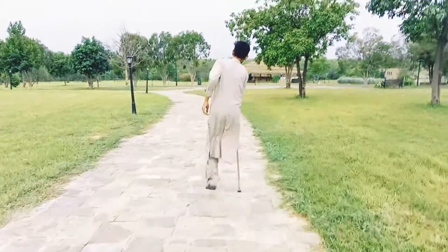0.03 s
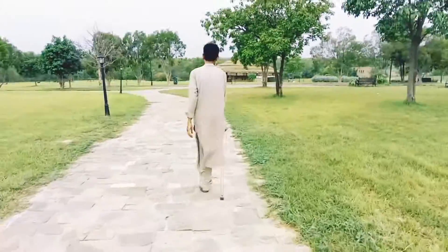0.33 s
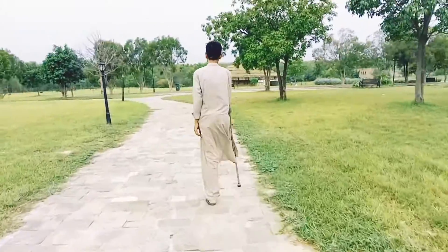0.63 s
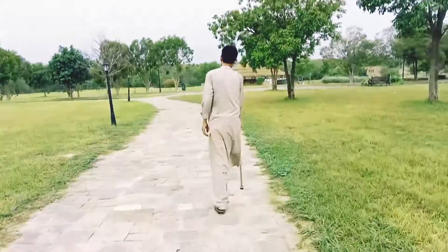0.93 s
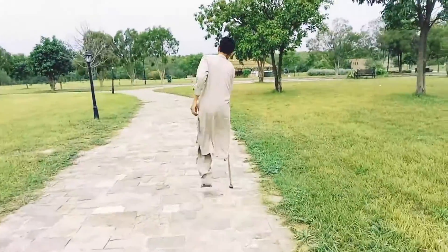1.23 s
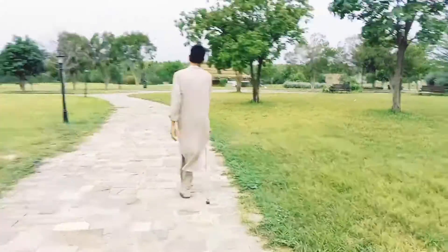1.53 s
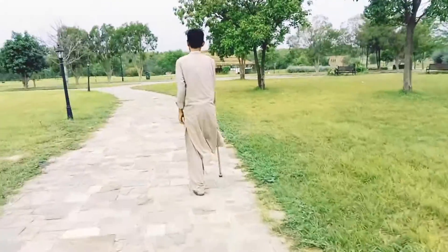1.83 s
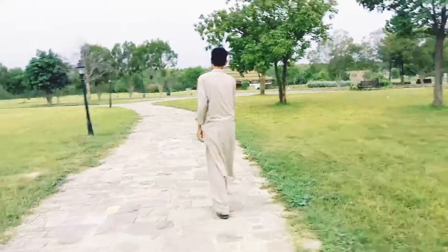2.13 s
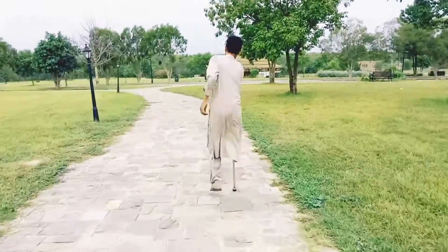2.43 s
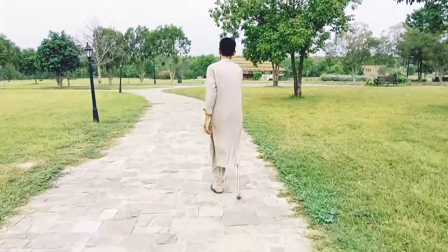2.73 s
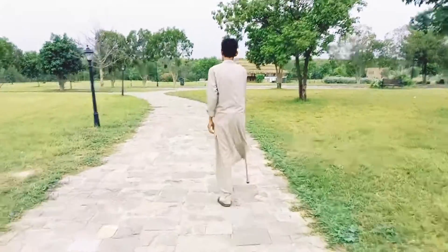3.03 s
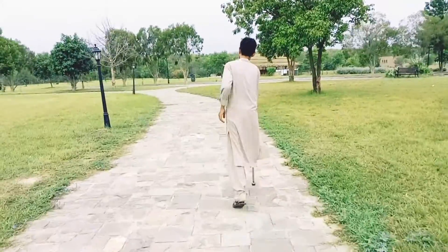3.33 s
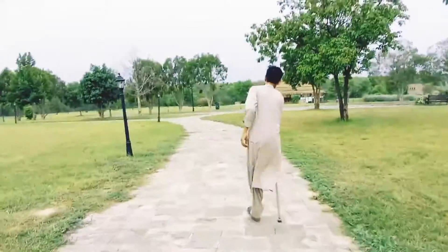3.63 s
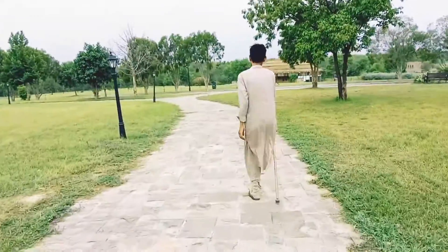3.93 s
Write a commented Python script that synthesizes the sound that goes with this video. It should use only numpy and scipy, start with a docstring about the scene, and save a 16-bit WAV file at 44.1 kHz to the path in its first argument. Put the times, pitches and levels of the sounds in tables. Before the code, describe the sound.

Birds twitter and trill in an open park, then one stands out with six quick, rising whistles. Underneath are faint crutch taps and shoe scuffs on paving a few steps from the microphone, and a soft leaf rustle.

```python
"""A bird whistles six arched calls, each higher than the last, over a park where others trill and chip.
Each bird note is a frequency-modulated tone, scattered by trunks and leaves; a chorus of tiny falling
chirps adds an insect-like shimmer. A crutch strikes the paving and its shaft rings in damped modes,
a shoe scuffs by friction on sand, and beneath it all far foliage rustles and light air rumbles."""
import sys
import numpy as np
from scipy import signal
from scipy.fft import rfft, irfft
from scipy.io import wavfile
from scipy.ndimage import uniform_filter1d

SR = 44100
rng = np.random.default_rng(int(sys.argv[2]) if len(sys.argv) > 2 else 0)


def master(y):
    """Save y as 16-bit WAV."""
    cut = np.clip(np.atleast_2d(y).T, -1, 1)
    pcm = np.round(cut * 32767)  # scale
    wavfile.write(sys.argv[1], SR, pcm.astype(np.int16))


N = 176400

# whistled calls: crest_s, crest_hz, dip_hz, end_hz, crest_db, lead_db, lead_s, fall_s
CALLS = [(2.137, 1296, 1036, 941, -48.5, -64.5, 0.045, 0.045),
         (2.393, 1362, 1070, 972, -45, -56, 0.101, 0.08),
         (2.693, 1506, 1224, 1016, -40.5, -50, 0.12, 0.074),
         (2.978, 1577, 1367, 1036, -40, -48.5, 0.13, 0.078),
         (3.258, 1654, 1451, 1104, -38.5, -39.5, 0.1167, .083),
         (3.542, 1706, 1528, 1141, -38.5, -44.5, 0.13, 0.074)]
# their reflections from near trunks: delay_s, gain_db
TRUNK_ECHOES = [(.011, -15), (.019, -14), (.033, -13), (.058, -18)]
# songbird notes: start_s, length_s, start_hz, middle_hz, end_hz, level_db, trill_depth_hz
SONG_NOTES = [(0, 0.051, 3088, 3152, 3230, -60.5, 0), (0.555, 0.051, 2450, 2400, 2480, -75.5, 0),
              (0.661, 0.034, 2610, 2640, 2660, -69.5, 24), (.312, 0.077, 5430, 5560, 5540, -62.5, 57),
              (0.466, 0.064, 1207, 1260, 1255, -68, -21), (0.955, 0.179, 1664, 1773, 1740, -62.5, 133),
              (1.24, 0.029, 2900, 2165, 2090, -56.5, 16), (1.31, 0.056, 1960, 1695, 1744, -66.5, 10),
              (1.624, 0.18, 1843, 1906, 1612, -61.5, 110.5), (1.638, 0.093, 2650, 2260, 2005, -65, 46),
              (1.326, 0.03, 3780, 3860, 3620, -71, 212), (1.735, 0.13, 4140, 4470, 4460, -78, 77),
              (1.912, 0.039, 4210, 3330, 2850, -74, 23), (1.821, 0.11, 1235, 1379, 1445, -66.5, 42),
              (2.037, 0.052, 3315, 2750, 2040, -63.5, 12), (2.451, 0.1, 1510, 1520, 1590, -52.5, 101),
              (2.462, 0.04, 3190, 2902, 3110, -57.5, 4), (2.629, 0.06, 2350, 2694, 2860, -59.5, 73),
              (2.691, 0.065, 2474, 2543, 2430, -63, 54), (2.89, 0.071, 2460, 2786, 2750, -65.5, 7),
              (2.954, 0.081, 2320, 2335, 2690, -62.5, 148), (2.993, 0.16, 2100, 1988, 1922, -53.5, 131.5),
              (3.084, 0.1, 2450, 2355, 2264, -61, 155), (3.148, 0.063, 2905, 2910, 2910, -63, 125.5),
              (3.648, 0.25, 1559, 1634, 1726, -55, 150), (3.733, 0.068, 2580, 2555, 2550, -63.5, -4),
              (3.734, 0.101, 5175, 5120, 5140, -64.5, 2)]
# loudness of the repeated chip: time_s, level_db
CHIP_LEVELS = [(1.37, -62), (1.53, -63), (1.7, -58.5), (2.35, -54.5), (3, -52), (3.3, -51.5), (4, -60)]
# bursts of twitter: start_s, level_db
TWITTER_BURSTS = [(-.025, -60), (.057, -59.5), (0.14, -55.5), (.223, -59.5), (0.623, -59.5), (0.7, -57),
                  (0.784, -56.5), (.866, -59), (0.949, -60.5), (1.034, -60.5), (1.127, -62), (1.557, -66),
                  (1.637, -64), (1.72, -63), (1.812, -64.5)]
# loudness of the chorus: time_s, level_db
CHORUS_LEVELS = [(0, -65), (.7, -67.5), (1.27, -64), (1.48, -73), (2.05, -69), (2.5, -64), (2.95, -62.5),
                 (3.45, -60), (4, -61.5)]
# spectrum of the chorus: frequency_hz, gain_db
CHORUS_SPECTRUM = [(5600, -45), (6200, 6), (6550, 6.5), (6850, 7), (7350, -5.5), (7900, 0), (8350, -2.5),
                   (8900, -37.5)]
# impacts of the crutch: start_s, click_db, knock_db, snap_db
CRUTCH_TAPS = [(0.2453, -77, -59.5, -56), (.288, -59.5, -77, -88), (0.372, -64, -91, -63),
               (0.859, -49, -78, -65), (.992, -59.5, -90, -82), (1.031, -51.5, -96, -62),
               (1.182, -59, -88, -82), (1.698, -69, -89, -68), (2.251, -57, -73, -63),
               (2.777, -44.5, -65.5, -63.5), (3.089, -40.5, -75, -73), (3.617, -58, -68.5, -72),
               (3.787, -48.5, -75, -55.5)]
# modes of its shaft: pitch_hz, level_db, t60_s
SHAFT_MODES = [(3534, -13.5, .08), (3770, -4.5, 0.016), (5300, 4, .016)]
# slides of the sole: start_s, length_s, grit_db, rasp_db, rub_db
SHOE_SCUFFS = [(0.223, 0.015, -88, -80, -87), (0.293, 0.073, -71.5, -77, -66.5),
               (0.787, 0.125, -89, -74, -79), (1.513, 0.045, -75, -70, -70.5),
               (1.627, 0.032, -83, -83, -72.5), (1.692, 0.072, -88, -73, -77),
               (2.148, 0.075, -84.5, -69.5, -80), (1.167, 0.092, -96, -68, -93),
               (2.36, 0.089, -99, -62, -68), (2.818, 0.1, -83.5, -63.5, -96.5),
               (3.412, 0.032, -80, -72, -81), (3.79, 0.13, -82, -83, -91)]
# spectra of the tip's crack, the sand, the sole's rasp and its dull rub: frequency_hz, gain_db
CRACK_SPECTRUM = [(2200, -19), (3200, -9), (5800, -2.5), (6800, 5), (8500, -37)]
GRIT_SPECTRUM = [(3000, -25), (6000, -6), (10000, 12), (13000, 14), (15500, 0)]
RASP_SPECTRUM = [(2500, -16), (3400, -2.5), (4200, -16.5), (5300, 5), (6200, -0.5), (9000, -58.5)]
RUB_SPECTRUM = [(300, -12), (850, 9), (1500, 4.5), (4000, -32)]
# distant flocks: centre_hz, spread_hz, level_db
FLOCKS = [(2700, 480, -76.5), (5296, 650, -81)]
# spectra of far foliage and moving air: frequency_hz, gain_db
FOLIAGE_SPECTRUM = [(35, -4.5), (150, 6), (370, -6), (480, -14), (800, -11.5), (1250, -2.5), (1800, -7.5),
                    (2500, -20), (3050, -6), (3600, -23.5), (4300, -27.5), (5200, -19.5), (8400, -8.5),
                    (9200, -38), (15000, -33)]
AIR_SPECTRUM = [(20, -31.5), (40, -25.5), (70, 3), (105, -6), (150, -7.5), (220, -18.5), (400, -50.5),
                (900, -65.5)]
# their loudness: time_s, level_db
FOLIAGE_LEVELS = [(0, -69), (1.25, -70.5), (1.48, -72.5), (2.1, -68.5), (3, -65), (4, -66.5)]
AIR_LEVELS = [(0, -69.5), (.75, -65.5), (.9, -81), (1.27, -66), (1.48, -89), (1.9, -74.5), (2.08, -71.5),
              (2.4, -72), (2.88, -75), (2.98, -54), (3.15, -65), (3.7, -67), (4, -69)]


def whistler(lift_hz=77.4, falter_db=-9, fall_db=-6.5):
    """Interference: a pure tone dips, arches, falters and slides down, beating against its echoes."""
    out, t = np.zeros(N), np.arange(N) / SR
    waver = 1 + 0.0109 * walk(81)
    pitch_stages = [-1, -.8, -.55, -.35, -.06, .1, .45, 1]
    gain_stages = [-1.03, -.85, -.42, -.15, .1, .27, .45, .75, 1.15]
    for crest_s, crest_hz, dip_hz, end_hz, crest_db, lead_db, lead_s, fall_s in CALLS:
        stage = (t - crest_s) / np.where(t < crest_s, lead_s, fall_s)  # -1 onset, 0 crest, 1 end
        lead_pitches = [dip_hz + lift_hz / 2, dip_hz + lift_hz, dip_hz, dip_hz + 35]
        arch_pitches = [crest_hz, crest_hz, (crest_hz + end_hz) / 2 + 20, end_hz]
        pitch = np.interp(stage, pitch_stages, lead_pitches + arch_pitches)
        pitch = uniform_filter1d(pitch, size=600) * waver
        lead_gains = undb([lead_db, lead_db + falter_db / 10])
        arch_gains = undb(crest_db) * undb([0, 0, falter_db, fall_db / 2, fall_db])
        envelope = np.interp(stage, gain_stages, [0, *lead_gains, *arch_gains, 0])
        out += np.sqrt(2) * envelope * np.sin(phase_of(pitch))
    out *= undb(1.7 * walk(85))  # the level flutters
    echoes = sum(undb(db) * np.interp(t - delay, t, out) for delay, db in TRUNK_ECHOES)
    return trees(out, wet_db=-9.5) + echoes


def songbirds():
    """Frequency modulation: slow sweeps are heard as slurs, fast ones as buzzy trills."""
    out = np.zeros(N)
    for start, length, *pitches, db, depth_hz in SONG_NOTES:
        add(out, start, undb(db) * note(length, pitches, depth_hz))
    return trees(out, wet_db=-4)


def chipping_bird(first_s=1.365, gap_s=.1605):
    """A pulse train: one high falling chip repeats among the leaves, slowing a little."""
    out = np.zeros(N)
    for k in range(17):
        start = first_s + gap_s * k + .00013 * k ** 2
        db = np.interp(start, *np.array(CHIP_LEVELS).T)
        top_hz = 7100 + 70 * rng.standard_normal()
        add(out, start, undb(db) * chirp(.02, top_hz, end_hz=6157))
    return trees(out * undb(3 * walk(200)), wet_db=-6)


def twittering_bird(gap_s=.011):
    """Direct sound outweighs reverberation as a nearer bird twitters in bursts of four chirps."""
    out = np.zeros(N)
    for start, db in TWITTER_BURSTS:
        for k, chance in enumerate(rng.standard_normal(4)):
            pulse = chirp(.0086, 8296 + 60 * chance, end_hz=7520)
            add(out, start + k * gap_s, undb(db + chance) * pulse)
    return trees(out, wet_db=-16)


def chorus(runs=100, gap_s=.011):
    """Superposition: runs of tiny falling chirps merge with faint noise into a grainy shimmer."""
    out = np.zeros(N)
    for i, (when, pitch, pace) in enumerate(rng.uniform(-0.83, 1, (runs, 3))):
        run_start = (i + when / 2 - 1) * N / SR / (runs - 1)
        for k, (detune, strength) in enumerate(rng.uniform(-1.003, 1, (4, 2))):
            top_hz = 8150 + 200 * pitch + 380 * detune
            start = run_start + k * gap_s * (1 + .15 * pace)
            add(out, start, undb(4 * strength) * chirp(.014, top_hz, top_hz - 1700))
    shimmer = unit(trees(out, wet_db=-6)) + rng.standard_normal(N) / 4
    return colour(shimmer, CHORUS_SPECTRUM) * curve(CHORUS_LEVELS)


def crutch(contact_s=.0006, crack_s=.0011, crunch_rise_s=.005, crunch_decay_s=.02, knock_hz=700):
    """Impact: the tip crunches sand, cracks and knocks on stone, and excites the shaft's damped modes."""
    out, t = np.zeros(N), np.arange(-SR // 20, SR // 10) / SR
    after = np.maximum(t, 0)  # the tip meets stone at t = 0
    contact = np.sin(np.pi / 2 * np.minimum(after / contact_s, 1)) ** 2
    blow = contact * np.exp(-after / crack_s)
    crunch = undb(-16) * np.exp(np.minimum(t / crunch_rise_s, -t / crunch_decay_s))
    knock = 2 * np.sin(2 * np.pi * knock_hz * after) * np.exp(-after / 0.0029)
    for start, click_db, knock_db, snap_db in CRUTCH_TAPS:
        ring = np.zeros(len(t))
        for hz, db, t60 in SHAFT_MODES:
            mode_hz = hz * (1 + 0.051 * rng.standard_normal())  # each tap rings differently
            ring += undb(db - 60 * after / t60) * np.sin(2 * np.pi * (mode_hz * t + rng.random()))
        crack, snap = (blow * colour(rng.standard_normal(len(t)), spectrum)
                       + crunch * colour(grit(len(t)), spectrum)
                       for spectrum in (CRACK_SPECTRUM, GRIT_SPECTRUM))
        click = contact * ring + crack
        add(out, start + t[0], undb(click_db) * click + undb(snap_db) * snap + undb(knock_db) * knock)
    return trees(out, wet_db=-23.5)


def shoe():
    """Sliding friction: the sole drags sand, rasps and rubs over the paving in uneven catches."""
    out, t = np.zeros(N), np.arange(N) / SR
    catches = undb(5.5 * np.tanh(walk(220)))
    layers = [colour(grit(N) * catches, spectrum)
              for spectrum in (GRIT_SPECTRUM, RASP_SPECTRUM, RUB_SPECTRUM)]
    for start, length, *levels_db in SHOE_SCUFFS:
        envelope = np.sin(np.pi * np.clip((t - start) / length, 0, 1))
        out += envelope * sum(undb(db) * layer for db, layer in zip(levels_db, layers))
    return trees(out, wet_db=-16)


def far_flocks(notes=60):
    """Reverberation blurs the short notes of two distant flocks into chatter."""
    out = np.zeros(N)
    for centre_hz, spread_hz, db in FLOCKS:
        flock = np.zeros(N)
        for i, (when, span, depth, *contour) in enumerate(rng.random((notes, 6))):
            base_hz = centre_hz + spread_hz * (2 * contour[0] - 1)
            pitches = base_hz + spread_hz / 2 * (np.array(contour) - .5)
            add(flock, (i - when) * N / SR / notes, note(.02 + .04 * span, pitches, 100 * depth))
        out += undb(db) * unit(trees(flock, wet_db=-4))
    return out


def foliage():
    """Broadband noise: countless far leaves sum to an even rustle."""
    rustle = colour(rng.standard_normal(N), FOLIAGE_SPECTRUM)
    return rustle * curve(FOLIAGE_LEVELS) * undb(0.092 * walk(30))


def air(gust_db=4):
    """Pressure fluctuations: uneven air at the microphone makes a low rumble."""
    gusts = rng.standard_normal(N) * undb(gust_db * walk(5.8))
    return colour(gusts, AIR_SPECTRUM) * curve(AIR_LEVELS)


def trees(x, wet_db, t60_s=.35):
    """Scattering: trunks and leaves add an exponentially decaying tail to the direct sound."""
    t = np.arange(SR) / SR
    tail = rng.standard_normal(SR) * undb(-60 * t / t60_s) * (1 - np.exp(-t / 0.0018))
    return x + undb(wet_db) * signal.fftconvolve(x, tail / np.linalg.norm(tail))[:N]


def note(length_s, pitches, depth_hz, trill_hz=69.77, rasp_db=3.2):
    """Modulation: a slur through three pitches trills in frequency and rasps in amplitude."""
    t = np.arange(int(length_s * SR)) / SR
    waver, rasp = (np.interp(t * 300, np.arange(100), row) for row in rng.standard_normal((2, 100)))
    trill = np.sin(phase_of(trill_hz * (1 + rasp / 5)))
    slur = np.polyval(np.polyfit([0, .5, 1], pitches, 2), t / length_s)
    pitch = (slur + depth_hz * trill) * (1 + .011 * waver)
    envelope = np.sin(np.pi * t / length_s) ** .5 * undb(rasp_db * rasp)
    return np.sqrt(2) * envelope * np.sin(phase_of(pitch))


def chirp(length_s, top_hz, end_hz):
    """A frequency sweep: a short whistle falls under a half-sine envelope."""
    progress = np.linspace(0, 1, int(length_s * SR))
    pitch = top_hz + (end_hz - top_hz) * progress ** 1.31
    return np.sqrt(2) * np.sin(np.pi * progress) * np.sin(phase_of(pitch))


def grit(size, spread_db=8):
    """Impulsive noise: dense sand grains crack, each with its own strength."""
    return rng.standard_normal(size) * undb(spread_db * rng.standard_normal(size))


def undb(db):
    """Decibels to amplitude ratio."""
    return 10 ** (np.asarray(db) / 20)


def unit(x):
    """Normalisation to rms 1."""
    return x / np.sqrt(np.mean(x ** 2) + 1e-20)


def curve(rows):
    """An amplitude envelope through (time_s, level_db) points."""
    return undb(np.interp(np.arange(N) / SR, *np.array(rows).T))


def colour(x, spectrum):
    """Spectral shaping by (frequency_hz, gain_db) points, at rms 1."""
    hz, db = np.array(spectrum).T
    f = np.maximum(np.fft.rfftfreq(len(x), 1 / SR), 1)
    gain = undb(np.interp(np.log(f), np.log(hz), db))
    return unit(irfft(rfft(x) * gain, len(x)))


def walk(rate_hz):
    """Low-passed noise: a smooth random fluctuation of rms 1."""
    f = np.fft.rfftfreq(N, 1 / SR)
    return unit(irfft(rfft(rng.standard_normal(N)) * np.exp(-(f / rate_hz) ** 2), N))


def add(out, start_s, x):
    """Superposition of x on out from start_s."""
    i = int(start_s * SR)
    a, b = max(i, 0), min(i + len(x), N)
    if b > a:
        out[a:b] += x[a - i:b - i]


def phase_of(hz):
    """Phase as the time integral of frequency."""
    return 2 * np.pi * np.cumsum(hz) / SR


def scene():
    """Superposition: the pressures of all sources add at one microphone."""
    birds = whistler() + songbirds() + far_flocks() + chipping_bird() + twittering_bird() + chorus()
    return (birds + crutch() + shoe() + foliage() + air())[None]


def record(dry):
    """Band limiting: a steep low-pass filter cuts the highest treble."""
    cutoff_hz = 15600
    return signal.sosfilt(signal.ellip(8, .2, 70, cutoff_hz, fs=SR, output="sos"), dry)


dry = scene()
out = record(dry)
master(out)
```